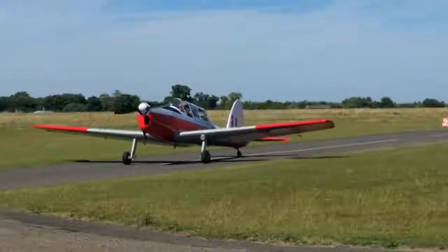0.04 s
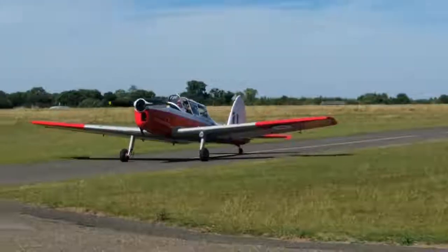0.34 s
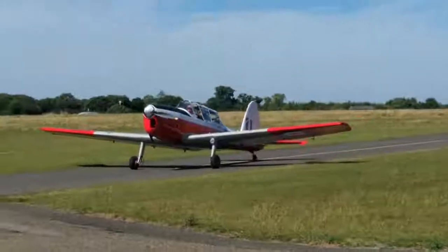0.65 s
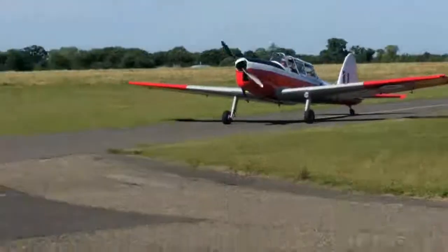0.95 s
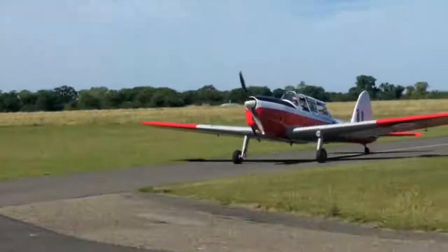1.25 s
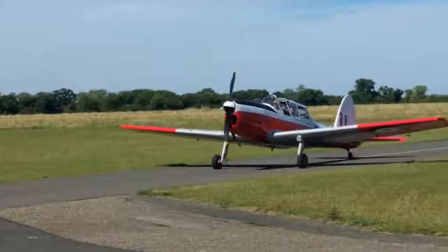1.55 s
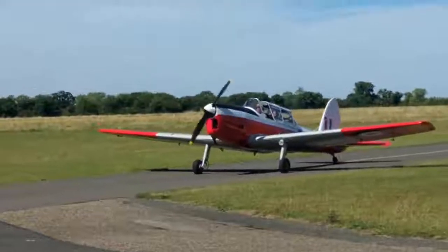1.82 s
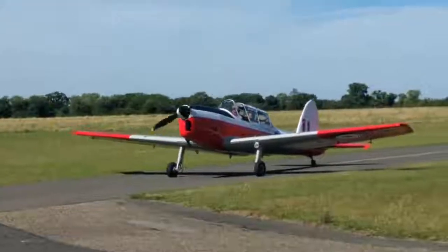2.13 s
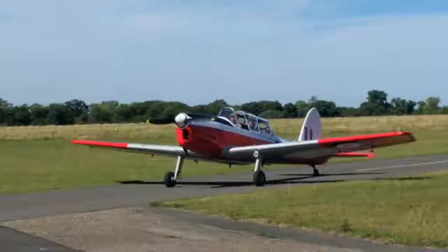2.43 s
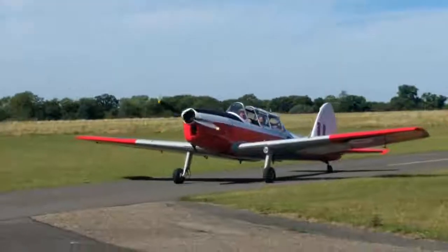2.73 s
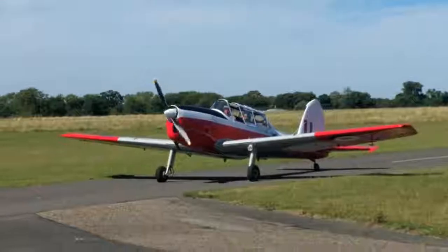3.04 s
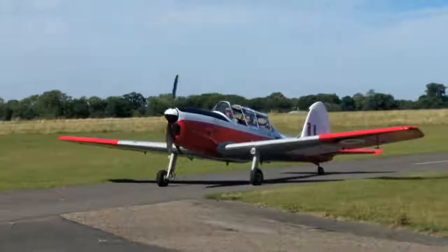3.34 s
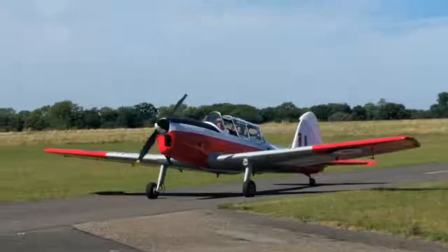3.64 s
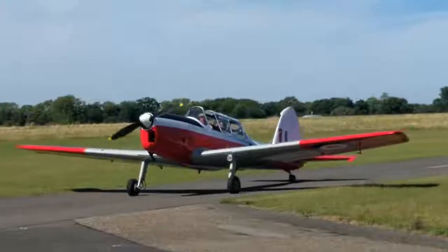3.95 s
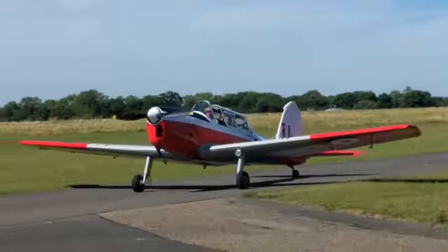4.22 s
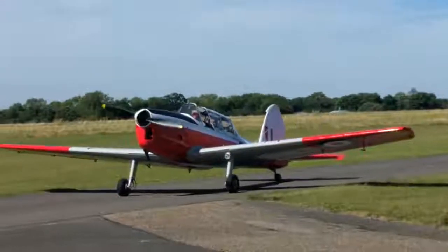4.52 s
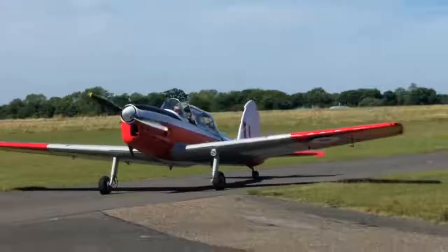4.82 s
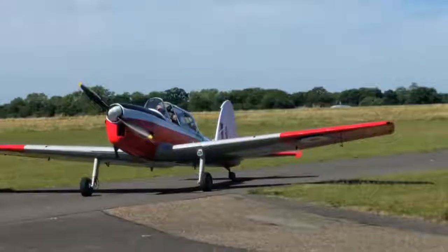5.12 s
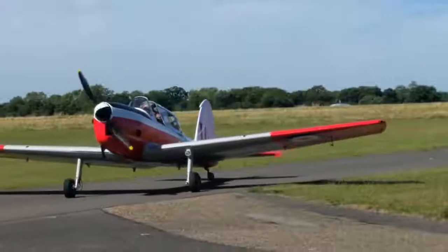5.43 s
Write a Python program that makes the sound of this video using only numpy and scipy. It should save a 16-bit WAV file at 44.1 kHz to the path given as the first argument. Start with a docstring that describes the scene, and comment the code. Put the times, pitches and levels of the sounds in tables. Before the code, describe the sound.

Wind buffets the microphone outdoors over the low, uneven throb of a small plane's idling engine. As the plane rolls nearer along the taxiway, the exhaust turns raspier and a high, gritty metal rattle comes forward, dotted with sharper ringing clacks. The propeller swishes lightly and the engine speed barely changes, with low gusts coming and going throughout.

```python
"""A light aeroplane taxis closer over an open airfield, its four-cylinder engine idling.
Each firing gives a low exhaust thud, a rasping bark, a bright clatter and a pinging clack;
the cylinders are unequal, so the beat lopes. The propeller swishes, the tarmac returns
a dull echo, and gusts and eddies buffet the microphone."""
import sys
import numpy as np
from scipy import signal
from scipy.fft import rfft, irfft, next_fast_len
from scipy.io import wavfile

SR = 44100
rng = np.random.default_rng(int(sys.argv[2]) if len(sys.argv) > 2 else 0)


def int16_out(signal):
    """Quantize to a 16-bit WAV file."""
    q = np.round(np.clip(np.atleast_2d(signal).T, -1, 1) * 32767)
    wavfile.write(sys.argv[1], SR, q.astype(np.int16))


N = 250047
TIME_S = np.arange(N) / SR

# Engine speed. Each row: time in seconds, firings per second.
FIRING_RATE = [(0.0, 31.76), (0.5, 29.99), (1.0, 30.67), (1.4, 31.16), (1.8, 30.63), (2.3, 30.87),
               (2.8, 30.59), (3.3, 31.02), (3.8, 30.89), (4.3, 30.61), (4.9, 30.27), (5.67, 30.86)]
# Cylinders in firing order. Each row: lateness of bark and clatter in seconds, thud, bark and
# clatter gains in dB, clatter decay in seconds, clack gain in dB.
CYLINDER_TRAITS = [(0.0021, -11.5, -5.5, 17.5, 0.021, -7), (0.0036, -6.5, -6, 14.5, 0.025, -4),
                   (0.0024, -5.5, -2.5, 16, 0.047, -0.5), (0.00076, -10, -9, 12.5, 0.022, -21)]
# Hardest clacks. Each row: time in seconds, ping gain in dB, crack gain in dB.
HARD_BLOWS = [(0.186, -27.5, -45), (0.317, -20.5, -46), (0.446, -17.5, -47), (0.711, -16.5, -30.5),
              (0.844, -17, -34.5), (1.364, -18.5, -43), (1.492, -20, -30.5), (1.623, -14.5, -44),
              (1.691, -12, -21), (1.753, -13, -25.5), (1.882, -17, -30), (2.013, -19, -24),
              (2.373, -19, -49), (2.404, -11, -32), (2.469, -18, -22.5), (2.529, -16, -21.5),
              (2.6, -16, -30), (2.661, -12, -21), (2.731, -29, -24.5), (2.795, -19, -24.5),
              (3.052, -14, -25), (3.154, -13.5, -30), (3.252, -21, -29), (3.282, -18, -24.5),
              (3.314, -11, -32), (3.379, -12, -27), (3.411, -14, -25), (3.44, -14, -32),
              (3.569, -15.5, -32), (3.703, -15.5, -18.5), (3.769, -12, -21), (4.023, -21, -27),
              (4.087, -18, -28), (4.35, -8.5, -24), (4.48, -19, -25), (4.547, -16, -38), (4.745, -15, -30),
              (4.876, -12.5, -23), (5.272, -15.5, -30), (5.534, -18.5, -41)]
# The approach. Each row: time in seconds, bark gain in dB, clatter gain in dB.
APPROACH_GAINS = [(0.1, -51, -49.5), (0.4, -48, -43), (0.9, -50, -44.5), (1.43, -46.5, -39.5),
                  (1.8, -38, -33.5), (2.18, -38.5, -36), (2.61, -34, -30.5), (3.0, -38, -36),
                  (3.58, -33, -29.5), (3.9, -34.5, -36), (4.74, -33, -32.5), (5.1, -31.5, -31),
                  (5.35, -35, -37.5), (5.6, -34.5, -33)]
# Mix within the bark. Each row: time in seconds, swish gain in dB, pop gain in dB.
BARK_BALANCE = [(1.2, 0, 0.5), (1.9, -7, -5), (4.2, -11, -6)]
# Layer gains. Each row: time in seconds, gain in dB.
THUD_GAIN = [(0, -20.5), (1, -23), (1.8, -25.5), (2.6, -22.5), (3.6, -24.5), (4.8, -21.5), (5.67, -24)]
SIZZLE_GAIN = [(0, -43.5), (1.1, -36), (2.6, -41)]
SLIPSTREAM_GAIN = [(0.15, -54.5), (0.39, -41), (0.5, -57), (0.68, -36), (0.9, -58), (1.12, -35.5),
                   (1.3, -53), (5.2, -36.5)]
# Engine spectra. Each row: frequency in Hz, relative density in dB.
THUD_SPECTRUM = [(31, -38.5), (61, 2.5), (92, 4.5), (122, -1), (153, -32.5), (184, -10.5), (215, -10.5),
                 (245, -15.5), (275, -20), (360, -21.5), (800, -33)]
BARK_SPECTRUM = [(200, -8.5), (340, -5.5), (450, -7.5), (620, 0), (880, -4.5), (960, -4), (1120, -1.5),
                 (1400, -8.5), (1950, -6), (2260, -12.5), (2550, -8.5), (3100, -17), (5000, -18),
                 (12000, -36.5)]
CLATTER_SPECTRUM = [(1200, -14), (3000, -13), (4300, -10.5), (5000, -7.5), (6000, -9), (7400, -10.5),
                    (8100, 1), (8800, -0.5), (9100, -1.5), (9600, -7), (10200, -13.5), (11100, -16),
                    (11500, -22), (16000, -24.5)]
CRACK_SPECTRUM = [(1700, 7), (3100, -1), (4300, 0.5), (7500, 8.5), (9600, 5), (11100, -5), (11600, -31),
                  (16000, -27)]   # also the slipstream's hiss
# Resonances. Each row: frequency in Hz, width in Hz, relative gain in dB.
PIPE_MODES = [(586.4, 32, 8.5), (774, 100, 0.5), (1109, 67, 4), (1930, 90, 1), (2547, 98, 1)]
METAL_MODES = [(2500, 57, -5), (3320, 24, 5), (3610, 116, -3.5), (4205, 100, 3.5), (4860, 63, 0),
               (5470, 62, 4), (6023, 110, 4), (6800, 260, -1)]
PING_MODES = [(7884, 216, 5.5), (8410, 395, 9.5), (8662, 320, 10)]   # the metal's high, bell-like modes
# Narrow gaps, cut into all but the thud and the wind. Each row: frequency in Hz, width in Hz, depth from 0 to
# 1.
SPECTRAL_GAPS = [(2236, 87, 0.63), (9150, 84, 0.13)]
# Echo off the tarmac. Each row: time in seconds, delay in ms.
ECHO_DELAY = [(0, 1.84), (1, 1.56), (2, 1.66), (5.67, 1.52)]
# Gusts. Each row: start in seconds, length in seconds, strength in dB.
WIND_GUSTS = [(0.065, 0.24, -19.5), (0.516, 0.032, -19), (0.702, 0.031, -18.5), (0.79, 0.094, -19),
              (0.97, 0.076, -20.5), (1.207, 0.22, -18), (1.495, 0.086, -16.5), (1.933, 0.086, -22),
              (2.21, 0.14, -22), (2.997, 0.029, -16), (3.105, 0.071, -15), (3.333, 0.053, -20),
              (3.54, 0.025, -19), (3.782, 0.62, -26), (5.288, 0.083, -21.5), (5.45, 0.06, -21.5),
              (5.617, 0.05, -25)]
# Wind spectra. Each row: frequency in Hz, relative density in dB.
RUMBLE_SPECTRUM = [(28, -18), (42, -9.5), (62, -3), (90, -5.5), (130, -12), (200, -24)]
FLUTTER_SPECTRUM = [(60, -2.5), (100, -5), (150, 1), (220, -2.5), (320, -10), (500, -20), (800, -37),
                    (1500, -52)]
# Heaviest eddies. Each row: time in seconds, relative peak in dB, width in seconds.
WIND_EDDIES = [(0.083, 0.5, 0.0012), (.142, -9, 0.00064), (0.19, -11.5, 0.00074), (0.419, -5.5, 0.0014),
               (0.458, -0.5, 0.0012), (0.548, -6, 0.0011), (.73, -10, 0.00064), (.87, -11.5, 0.0011),
               (0.906, -1.5, 0.0019), (1.213, -3, 0.0011), (1.239, -6.5, 0.0012), (1.296, -7, 0.0011),
               (1.305, 1.5, 0.0037), (1.329, -11, 0.00096), (1.543, -8, 0.00047), (2.282, -8, 0.0024),
               (2.855, -6, 0.0017), (3.118, -7, 0.00094), (3.18, 4, 0.002), (3.192, -4, 0.0061),
               (3.435, -4.5, 0.0016), (4.033, -8, 0.0019), (4.267, -5, 0.0021), (5.35, -12.5, 0.0005),
               (5.486, -9.5, 0.0013)]


def firings(start_phase=.15):
    """Firing times, then the columns of the cylinder that fires at each."""
    phase = start_phase + np.cumsum(curves(FIRING_RATE)[0]) / SR
    count = np.arange(int(phase[-1]) + 1)
    cylinders = np.array(CYLINDER_TRAITS)[count % len(CYLINDER_TRAITS)]
    return np.interp(count, phase, TIME_S), *cylinders.T


def thud(times_s, db, uneven_db=1.35, lag_s=.00213):
    """One pressure pulse per firing booms in the exhaust."""
    pulses = np.zeros(N)
    onsets = np.clip((times_s + lag_s) * SR, 0, N - 1).astype(int)
    pulses[onsets] = from_db(db + rng.normal(0, uneven_db, len(times_s)))
    boom = colour(pulses, THUD_SPECTRUM)
    # a low resonance holds back part of each pulse, evening the thuds into a drone
    return unit_rms(boom - 2 * resonate(boom, hz=122, width_hz=16))


def bark(times_s, db, gas_lead_s=.0054, pop_lead_s=.0052):
    """Each firing pops in the pipe and gas tears out, over the propeller's steady swish."""
    swish_db, pop_db = curves(BARK_BALANCE)
    strength_db = db + rng.normal(0, 1.6, len(times_s))
    gate = bursts(times_s - gas_lead_s, strength_db, rise_s=.004, decay_s=.012)
    gas = np.hypot(gate, from_db(swish_db)) * noise()
    pop_s = times_s - pop_lead_s
    pops = bursts(pop_s, strength_db, rise_s=.002, decay_s=.007) * noise()
    pipe = ring(pops, PIPE_MODES, pop_s, vary_db=1.2, detune=.012, rise_per_s=.008)
    return unit_rms(colour(gas, BARK_SPECTRUM)) + from_db(pop_db) * unit_rms(pipe)


def clatter(times_s, db, decay_s, spit_floor_db=-20, tick_floor_db=-22, grain_db=2):
    """Gritty noise spits after each firing; the valve gear ticks on ringing metal."""
    spit_spread, tick_spread, jitter = rng.standard_normal((len(times_s), 3)).T
    spit_gate = bursts(times_s, db + 2 * spit_spread, rise_s=.00059, decay_s=decay_s)
    spit = np.hypot(spit_gate, from_db(spit_floor_db)) * from_db(grain_db * drift(480)) * noise()
    tick_s = times_s + .0034 + .00014 * jitter
    tick_gate = bursts(tick_s, db + 1.5 * tick_spread, rise_s=.0014, decay_s=.0074)
    ticks = np.hypot(tick_gate, from_db(tick_floor_db)) * noise()
    metal = ring(ticks, METAL_MODES + PING_MODES, times_s)
    return from_db(1) * unit_rms(colour(spit, CLATTER_SPECTRUM)) + from_db(-1) * unit_rms(metal)


def clacks(times_s, db, lag_s=.00052, uneven_db=2):
    """Metal clacks after each firing, at times much harder: a ringing crack and a high ping."""
    blow_s = times_s + lag_s
    ping_db = db + rng.normal(0, uneven_db, len(times_s))
    crack_db = ping_db - 5
    for blow in HARD_BLOWS:
        nearest = np.argmin(np.abs(times_s - blow[0]))
        blow_s[nearest], ping_db[nearest], crack_db[nearest] = blow
    grit = unit_rms(noise())
    gate = bursts(blow_s, crack_db, rise_s=.0028, decay_s=.0065)
    crack = from_db(-1) * gate * unit_rms(colour(grit, CRACK_SPECTRUM))
    metal = from_db(-4.5) * ring(gate * grit, METAL_MODES, blow_s)
    ping_force = bursts(blow_s, ping_db, rise_s=.002, decay_s=.006) * noise()
    return crack + metal + ring(ping_force, PING_MODES, blow_s)


def sizzle(times_s):
    """The metal's highest modes ring on between blows."""
    return from_db(curves(SIZZLE_GAIN)[0]) * ring(noise(), PING_MODES[1:], times_s)


def squeal(start_s=.32, length_s=.11, gain_db=-39, tones_hz=(8500, 8740), width_hz=60):
    """Once, far off, the metal sings in two close, thin tones."""
    sounding = (TIME_S > start_s) & (TIME_S < start_s + length_s)
    gate = low_pass(sounding.astype(float), hz=100)
    tones = sum(resonate(resonate(noise(), hz, width_hz), hz, width_hz) for hz in tones_hz)
    return from_db(gain_db) * gate * unit_rms(tones)


def slipstream(times_s):
    """Air from the propeller hisses, throbbing at the firing rate as it swells and ebbs."""
    phase = np.interp(TIME_S, times_s, np.arange(len(times_s)))
    throb = 1 + .5 * np.sin(2 * np.pi * phase)
    hiss = unit_rms(colour(noise(), CRACK_SPECTRUM))
    return from_db(curves(SLIPSTREAM_GAIN)[0]) * throb * hiss


def notch(x):
    """Narrow gaps hollow out the sound, all but the thud and the wind."""
    for hz, width_hz, depth in SPECTRAL_GAPS:
        x = x - depth * resonate(x, hz, width_hz)
    return x


def flicker(x, depth=.3, rate_hz=22, band_hz=450):
    """Narrow treble bands swell and dip independently."""
    centres_hz = np.arange(6, 22) * band_hz
    return x + sum(depth * drift(rate_hz) * resonate(x, hz, band_hz) for hz in centres_hz)


def tarmac_echo(x, gain=.17, cutoff_hz=3500):
    """A dull ground reflection cuts slowly moving notches into the sound."""
    delay_s = curves(ECHO_DELAY)[0] / 1000
    return x + gain * np.interp(TIME_S - delay_s, TIME_S, low_pass(x, cutoff_hz, order=1))


def gust_strength_db(release_s, attack_s=.026, breeze_db=-29.5):
    """Each gust rises, holds and dies back into the breeze."""
    power = from_db(breeze_db) ** 2
    for start_s, length_s, db in WIND_GUSTS:
        attack = np.clip((TIME_S - start_s) / attack_s + 1, 0, 1)
        release = np.exp(-np.clip((TIME_S - start_s - length_s) / release_s, 0, 20))
        power = power + (from_db(db) * attack * release) ** 2
    return 10 * np.log10(power)


def wind(lump_db=8.5, lump_hz=34.5):
    """Turbulence at the microphone: gusts drive a lumpy flutter and a deep, lingering rumble."""
    flutter_db = gust_strength_db(release_s=.019) - 1
    lingering_db = gust_strength_db(release_s=.038)
    rumble_db = -20.5 + .89 * (lingering_db - lingering_db.mean())
    rumble = unit_rms(colour(noise(), RUMBLE_SPECTRUM))
    lumps = noise() * from_db(lump_db * np.tanh(drift(lump_hz)))
    flutter = unit_rms(colour(lumps, FLUTTER_SPECTRUM))
    return from_db(rumble_db) * rumble + from_db(flutter_db) * flutter


def eddies(gain_db=-2, wake_gain=.15, wake_lag_widths=5):
    """A passing eddy pushes, then pulls; a weaker swirl follows in its wake."""
    pressure = np.zeros(N)
    for time_s, db, width_s in WIND_EDDIES:
        for gain, lag_widths in ((1, 0), (wake_gain, wake_lag_widths)):
            offset = (TIME_S - time_s) / width_s - lag_widths
            near = np.abs(offset) < 4
            push_pull = -np.sqrt(2 * np.e) * offset[near] * np.exp(-offset[near] ** 2)
            pressure[near] += gain * from_db(db + gain_db) * push_pull
    return pressure


def bursts(times_s, db, rise_s, decay_s):
    """Envelope of bursts: linear rise, exponential decay, summed in power."""
    power = np.zeros(N)
    for start_s, gain, fall_s in zip(times_s, from_db(db), np.broadcast_to(decay_s, len(times_s))):
        first = max(int(start_s * SR), 0)
        span = slice(first, first + SR // 10)
        age_s = np.maximum(TIME_S[span] - start_s, 0)
        rise = np.minimum(age_s / rise_s, 1)
        fall = np.exp(-np.maximum(age_s - rise_s, 0) / fall_s)
        power[span] += (gain * rise * fall) ** 2
    return np.sqrt(power)


def ring(force, modes, times_s, vary_db=2.2, detune=.011, rise_per_s=0):
    """Each blow rings the modes at its own strengths and pitches; unit noise gives about rms 1."""
    edges = np.unique(np.clip(np.r_[0, times_s * SR, N], 0, N).astype(int))
    spread = rng.standard_normal((2 * len(times_s), len(modes), 2))
    out, force = np.zeros(N), force + 1e-18
    for k, (hz, width_hz, db) in enumerate(modes):
        state = np.zeros(2)
        for start, end, (louder, higher) in zip(edges, edges[1:], spread[:, k]):
            pitch_hz = hz * (1 + detune * higher + rise_per_s * (start - N / 2) / SR)
            drive = force[start:end] * from_db(db + vary_db * louder)
            part, state = signal.lfilter(*resonator(pitch_hz, width_hz), drive, zi=state)
            out[start:end] += part * (-1) ** k
    power = sum(from_db(db) ** 2 * np.pi * width_hz / SR for _, width_hz, db in modes)
    return out / np.sqrt(power)


def resonator(hz, width_hz):
    """Coefficients of one resonance, peak gain 1."""
    r = np.exp(-np.pi * width_hz / SR)
    return (1 - r * r) / 2 * np.array([1, 0, -1]), [1, -2 * r * np.cos(2 * np.pi * hz / SR), r * r]


def resonate(x, hz, width_hz):
    return signal.lfilter(*resonator(hz, width_hz), x)


def colour(x, spectrum):
    """Minimum-phase filter with the given spectrum, falling away beyond both ends."""
    size = 2 * next_fast_len(N // 2 + SR // 4)
    hz, db = np.transpose(spectrum)
    hz, db = np.r_[hz[0] / 2, hz, hz[-1] * 2], np.r_[db[0] - 20, db, db[-1] - 40]
    grid_hz = np.maximum(np.fft.rfftfreq(size, 1 / SR), 1)
    gain = from_db(np.interp(np.log(grid_hz), np.log(hz), db)) / np.maximum(grid_hz / hz[-1], 1)
    cepstrum = irfft(np.log(gain))
    cepstrum[1:size // 2] *= 2
    cepstrum[size // 2 + 1:] = 0
    return irfft(rfft(x, size) * np.exp(rfft(cepstrum)))[:N]


def low_pass(x, hz, order=2):
    return signal.sosfilt(signal.butter(order, hz, fs=SR, output="sos"), x)


def noise():
    return rng.standard_normal(N)


def drift(hz):
    """Random wander below hz, rms 1."""
    return unit_rms(low_pass(rng.standard_normal(N + SR), hz)[SR:])


def curves(rows):
    """Each value column of a timed table, per sample."""
    times_s, *columns = np.transpose(rows)
    return [np.interp(TIME_S, times_s, column) for column in columns]


def from_db(db):
    return 10 ** (np.asarray(db) / 20)


def unit_rms(x):
    return x / np.sqrt(np.mean(x ** 2) + 1e-20)


def scene():
    """The engine nears, all but its thud echoing off the tarmac; wind acts at the microphone."""
    times_s, late_s, thud_db, bark_db, clatter_db, decay_s, clack_db = firings()
    bark_gain_db, clatter_gain_db = curves(APPROACH_GAINS)
    exhaust = from_db(curves(THUD_GAIN)[0]) * thud(times_s, thud_db)
    rasp = from_db(bark_gain_db + 2.18) * bark(times_s + late_s, bark_db)
    rattle = from_db(clatter_gain_db - .5) * clatter(times_s + late_s, clatter_db, decay_s)
    clack_gain_db = np.interp(times_s, TIME_S, clatter_gain_db) + 9
    knocks = clacks(times_s, clack_db + clack_gain_db)
    aeroplane = rasp + rattle + knocks + sizzle(times_s) + squeal() + slipstream(times_s)
    return (exhaust + tarmac_echo(flicker(notch(aeroplane))) + wind() + eddies())[None]


def record(dry, low_cut_hz=38, high_cut_hz=15900):
    """The deepest bass is shed, the hardest gust clips softly, the top is cut."""
    thinned = signal.sosfilt(signal.butter(6, low_cut_hz, "high", fs=SR, output="sos"), dry)
    clipped = 1.02 * thinned / (1 + thinned ** 8) ** (1 / 8)
    return signal.sosfilt(signal.ellip(12, .1, 90, high_cut_hz, fs=SR, output="sos"), clipped)


dry = scene()
out = record(dry)
int16_out(out)
```